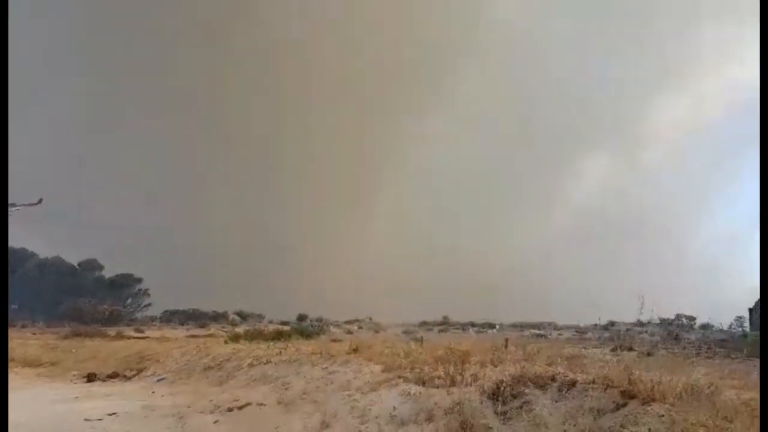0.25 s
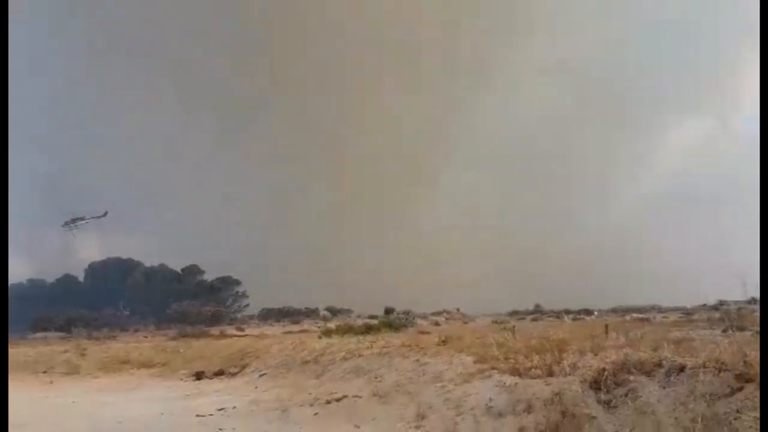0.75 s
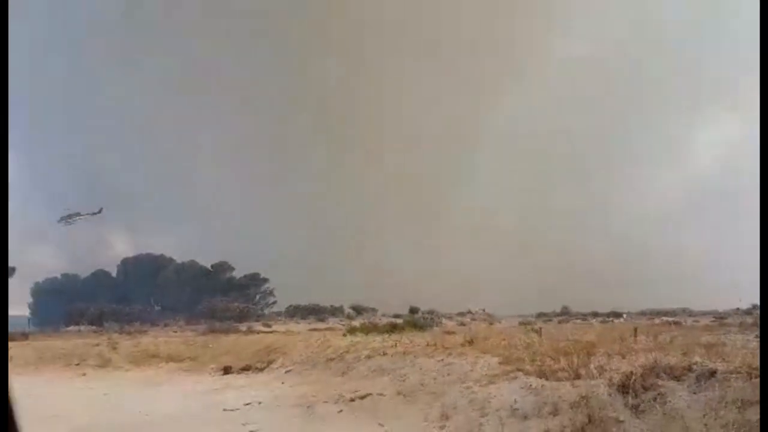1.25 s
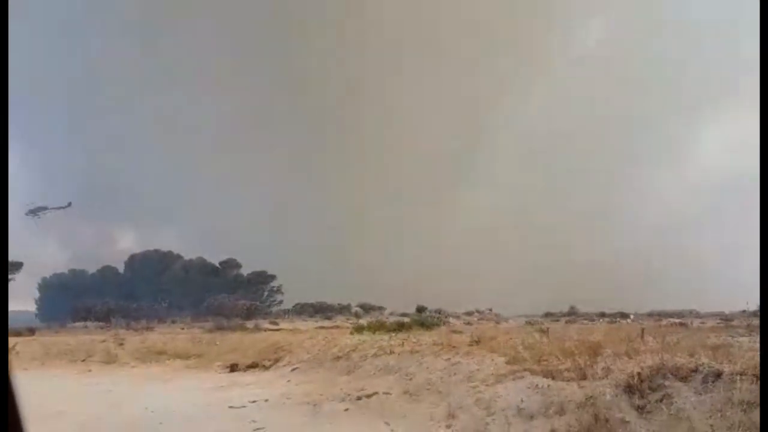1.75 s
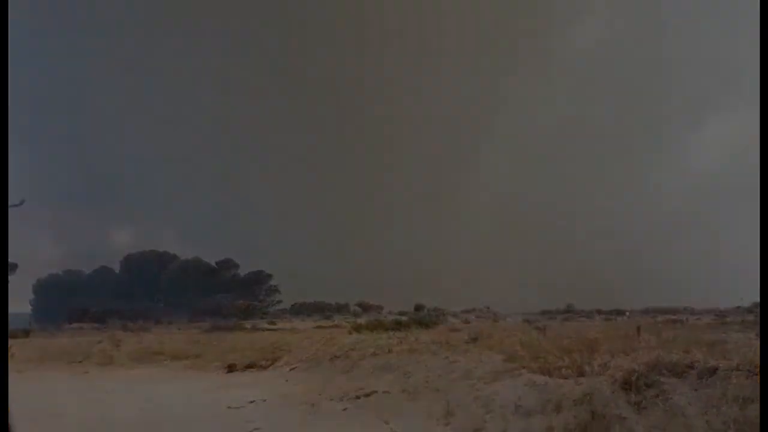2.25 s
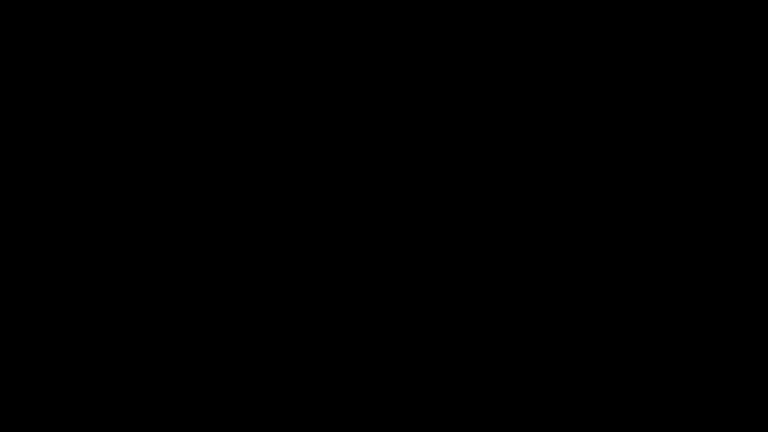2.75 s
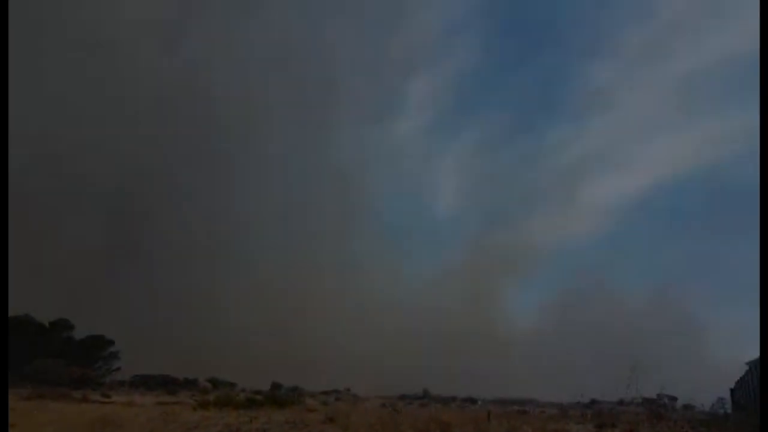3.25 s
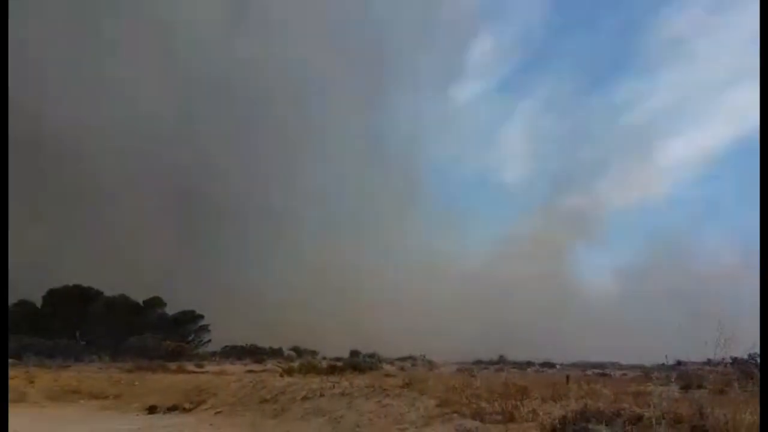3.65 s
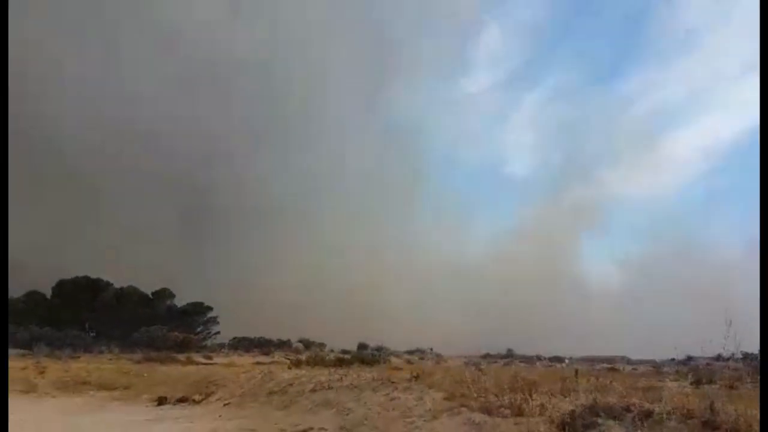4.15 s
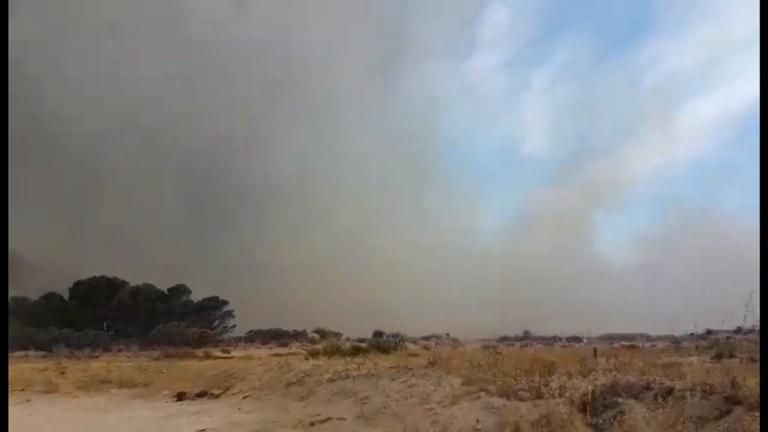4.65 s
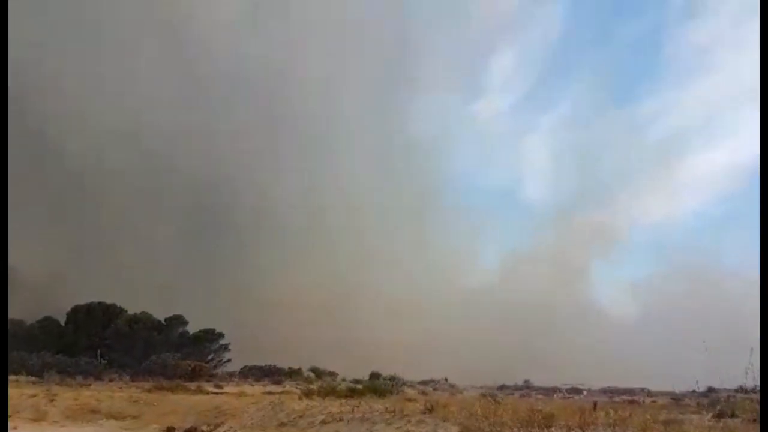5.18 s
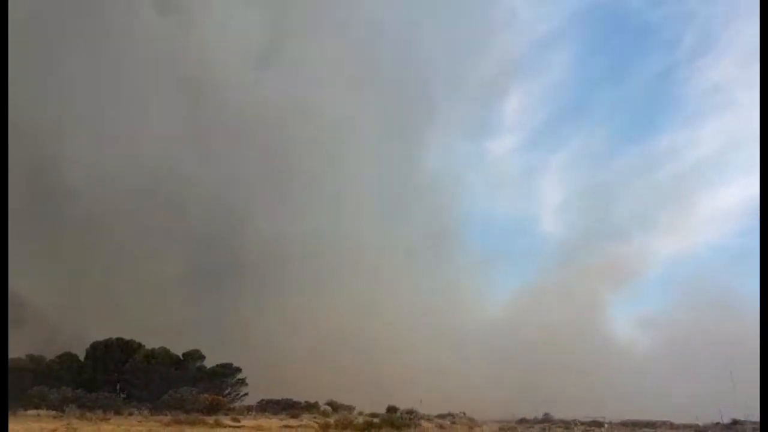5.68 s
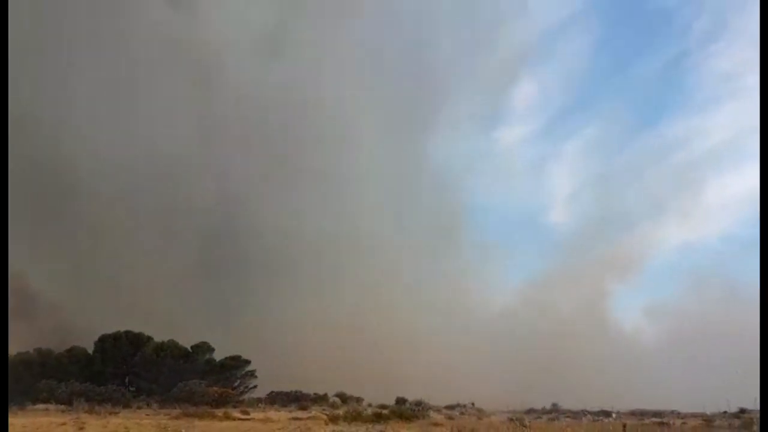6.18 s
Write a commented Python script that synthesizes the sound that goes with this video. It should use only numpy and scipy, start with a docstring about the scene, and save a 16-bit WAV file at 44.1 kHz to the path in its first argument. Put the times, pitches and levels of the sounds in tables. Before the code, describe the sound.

A microphone in open dry land first catches distant helicopter rumble, whooshing gently in the wind, with grass hiss and small dry snaps. The sound drops out for an instant, then jumps to a nearer machine: sharp pitched tail buzz, about eleven main-blade beats a second, and airy swish. A small tick passes early; thump and roar grow toward the end, with a short echo off ground and trees.

```python
"""Open scrub with a bushfire, and a helicopter at work over it. First it is far off: a smeared, wavering hum
and whooshing rush made of sines and noise, over hissing wind and faint crackle. After a moment of silence the
scene changes and it is much nearer: the tail rotor buzzes in sharp pulses, and the main blades slap about
eleven times a second, with a deep thump that grows as it approaches. Swishing and roaring noise lie over both
rotors."""
import sys
import numpy as np
from scipy import signal
from scipy.fft import rfft, irfft, next_fast_len
from scipy.io import wavfile
from scipy.ndimage import uniform_filter1d, minimum_filter1d, map_coordinates

SR = 44100
rng = np.random.default_rng(int(sys.argv[2]) if len(sys.argv) > 2 else 0)


def persist_wave(psi):
    """Save psi, clipped to +-1, as 16-bit WAV."""
    counts = np.round(np.clip(psi, -1, 1) * 32767).astype(np.int16)
    wavfile.write(sys.argv[1], SR, np.atleast_2d(counts).T)


N = 283224
SILENCE_FROM_S, SILENCE_TO_S = 2.821, 2.853  # between the far and the near helicopter


def near_helicopter():
    """Two geared rotors throw pulses and puffs of turbulence; the turbine roars and the land echoes."""
    tail_count, main_count = blade_counts()
    tail = tail_rotor(tail_count)
    main = main_rotor(main_count)
    swish = blade_swish(tail_count, main_count)
    slap_echo = amp(-12) * scattered(main)
    buzz_echo = amp(-24) * scattered(tail + swish)
    return tail + main + terrain_rebound(main) + swish + turbine_exhaust() + slap_echo + buzz_echo


# How close the helicopter is, which drives the level and colour of the near sounds.
# Each row: time in seconds, nearness from 0 (far) to 1 (near).
APPROACH = [(2.85, 0.16), (3.6, 0), (4.2, 0.084), (5, 0.46), (5.4, 0.93), (5.9, 1), (6.42, 0.92)]


def nearness():
    """The approach as straight stretches between the rows, one value for every sample."""
    return curve(APPROACH)


# How fast the tail blades pass, sinking as the Doppler lift fades.
# Each row: time in seconds, tail blades per second.
TAIL_BLADE_RATE = [(2.85, 58.01), (3.45, 57.95), (4.8, 57.31), (6.05, 57.22), (6.42, 56.82)]


def blade_counts():
    """Tail and main blades passed so far; gears tie the rotors, at 5.347 tail blades per main blade."""
    rate = curve(TAIL_BLADE_RATE)
    tail_count = blade_count(rate, first=2.8521)
    main_count = blade_count(rate / 5.347, first=2.8858)
    return tail_count, main_count


# The colour of one tail blade pulse.
# Each row: frequency in Hz, then relative level in dB when far, halfway and near.
TAIL_PULSE_COLOUR = [(58, -22, -17.5, -15.5), (108, -25.5, -16, -17.5), (161, -21, -5.5, 5.5),
                     (241, -8, 0, -3), (312, -9.5, -4, -7.5), (341, 1.5, 4, 5), (414, -3.5, -3, -4),
                     (458, -12, -1.5, -10.5), (530, -12.5, -4.5, -5), (577, -10, -9.5, -9),
                     (698, -16.5, -20.5, -16.5), (766, -28.5, -23, -26), (830, -43.5, -34, -48),
                     (1600, -48.5, -40, -37.5)]
TAIL_DB, TAIL_GROWS_DB = -24.5, 2  # level when far, and gain when near
HARD_TAIL_DB = -4  # the buzz is weaker while the blades bite hard


def tail_rotor(count):
    """Each small fast blade sends out a sharp suction pulse, and together they buzz."""
    level_db = TAIL_DB + TAIL_GROWS_DB * nearness() + HARD_TAIL_DB * hard_bite()
    return blade_pulses(count, level_db, TAIL_PULSE_COLOUR, scatter_db=1.0, ripple_db=1.6,
                        jitter_s=0.00004, dull_hz=1430, ground_hz=103)


# The colour of one main blade slap.
# Each row: frequency in Hz, then relative level in dB when far and near.
MAIN_PULSE_COLOUR = [(12, -43, -33.5), (43.6, -10, -7.5), (63, -8.5, -2), (83.3, -19, -18), (96, -2, 1),
                     (129, -7.5, 4), (164, -6.5, 2), (200, -9, -19.5), (224, -2.5, -13.5), (342, -1, -6),
                     (463, -8.5, -20.5), (604, -11.5, -18), (670, -8, -26), (886, -29.5, -42)]
SLAP_DB, SLAP_GROWS_DB = -37, 14.5  # level when far, and gain when near
THUMP_DB, THUMP_GROWS_DB = -32, 12  # the same for the deep part
HARD_SLAP_DB, SLAP_UNTIL_S, SLAP_EASE_S = 8, 3.47, 0.14  # extra slap at first, fading around this time
THUMP_LAG_S = 0.0046  # the thump trails the crack of the slap


def main_rotor(count):
    """Each big blade slaps the air; the bass is split off as a thump with its own level and delay."""
    near = nearness()
    hard_slap = step(SLAP_UNTIL_S - clock(), SLAP_EASE_S)
    slap_db = SLAP_DB + SLAP_GROWS_DB * near + HARD_SLAP_DB * hard_slap
    thump_db = THUMP_DB + THUMP_GROWS_DB * near
    # turned over: these pulses press where the tail's suck
    slap = -blade_pulses(count, slap_db, MAIN_PULSE_COLOUR, scatter_db=0.9, ripple_db=0.98,
                         jitter_s=0.0004, dull_hz=870, ground_hz=125)
    bass = filtered(slap, lambda hz: 1 / (1 + (hz / 160) ** 6))
    late_bass = filtered(bass, lambda hz: delay(hz, THUMP_LAG_S))
    thump = amp(thump_db - slap_db) * late_bass  # undoes the slap's level and sets the thump's
    return slap - bass + thump


def terrain_rebound(main):
    """The bass of each slap comes back once more from the terrain, 14 ms later and weaker."""
    return filtered(main, lambda hz: amp(-9) / (1 + (hz / 170) ** 4) * delay(hz, 0.014))


# The colour of the turbulence. Each row: frequency in Hz, relative level in dB.
SWISH_NOISE_COLOUR = [(400, -22.5), (850, 5.5), (1000, 0.5), (1250, -1.5), (1520, 0.5), (1800, -5),
                      (2300, -9.5), (3200, -19), (4000, -21.5), (4800, -26), (5600, -36.5), (8000, -42.5),
                      (10000, -56.5)]
# Brief jumps of the swish. In all rows but the last, a blade cuts a vortex and cracks harder;
# the last row is no blade but a short click of noise where the sound is cut off.
# Each row: time in seconds, rise of the swish in dB.
SWISH_JUMPS = [(3.531, 8), (4.426, 6), (4.831, 6.5), (6.398, 10.5)]
SWISH_JUMP_S = 0.011  # length of such a jump
SWISH_DB, SWISH_GROWS_DB = -60, 2  # level when far, and gain when near
HARD_SWISH_DB = 3.5  # extra swish while the blades bite hard
# it opens up once near enough: nearness, softness of that change, gain
SWISH_OPENS_AT, SWISH_EASE, SWISH_OPENS_DB = 0.14, 0.031, 6.5


def blade_swish(tail_count, main_count):
    """Every blade stirs a puff of turbulence: noise that swells just after the blade has passed."""
    near = nearness()
    level_db = SWISH_DB + SWISH_GROWS_DB * near + HARD_SWISH_DB * hard_bite()
    level_db += SWISH_OPENS_DB * step(near - SWISH_OPENS_AT, SWISH_EASE)
    for s, rise_db in SWISH_JUMPS:
        level_db += rise_db * swell(s, SWISH_JUMP_S)
    uneven = amp(3.1 * wobble(60))
    tail_puffs = puffs(tail_count - 0.12, sharpness=3.6) * uneven
    main_puffs = puffs(main_count - 0.04, sharpness=20)
    gate = unit(0.3 + tail_puffs + 0.43 * main_puffs)
    return amp(level_db + 1.5 * wobble(25)) * gate * noise(SWISH_NOISE_COLOUR)


# The colour of the turbine's roar. Each row: frequency in Hz, relative level in dB.
ROAR_COLOUR = [(900, -19), (1350, -13.5), (1520, 1), (1750, -10.5), (2050, -0.5), (2350, 1.5), (2750, -14),
               (3200, -15), (4000, -22.5), (4700, -22.5), (5400, -26.5), (8000, -36.5), (10000, -51.5)]
EXHAUST_DB, EXHAUST_GROWS_DB = -87, 21  # level when far, and gain when near


def turbine_exhaust():
    """The turbine's roar: unsteady coloured noise that grows with the approach."""
    level_db = EXHAUST_DB + EXHAUST_GROWS_DB * nearness() + 2.8 * wobble(21)
    return amp(level_db) * noise(ROAR_COLOUR)


def hard_bite():
    """At first the blades bite hard (1), easing off to 0 around 3.3 s."""
    return step(3.315 - clock(), ease=0.069)


def blade_count(rate, first):
    """Blades passed so far; blade 0 passes at the time first."""
    turns = np.cumsum(rate) / SR
    return turns - np.interp(first, clock(), turns)


def puffs(count, sharpness):
    """One smooth bump per blade, narrower for more sharpness."""
    return np.exp(sharpness * (np.cos(2 * np.pi * count) - 1))


def blade_pulses(count, level_db, table, scatter_db, ripple_db, jitter_s, dull_hz, ground_hz, size=4096):
    """One suction pulse per blade; its colour follows the nearness and is rippled by the air."""
    s = np.interp(np.arange(int(count[-1]) + 1), count, clock())
    spacing = np.mean(np.diff(s)) * SR
    s = s + jitter_s * rng.standard_normal(len(s))
    hz = np.fft.rfftfreq(size, 1 / SR)
    near = np.interp(s, clock(), nearness())[:, None]

    # blend the table's columns, from far to near
    stages = len(table[0]) - 1
    colour_db = 0
    for k in range(stages):
        share = np.maximum(1 - abs(near * (stages - 1) - k), 0)
        colour_db = colour_db + share * along(table, hz, axis=k + 1)
    ripple = unit(uniform_filter1d(rng.standard_normal((len(s), len(hz))), size=10, axis=1))
    gain = amp(colour_db + ripple_db * (1 + near) * ripple)
    gain = gain / (1 + (hz / dull_hz) ** 5)  # the air takes the treble

    # folding the cepstrum (minimum phase) makes each pulse start at its blade, never before
    cepstrum = irfft(np.log(gain + 1e-6))
    cepstrum[:, 1:size // 2] *= 2
    cepstrum[:, size // 2 + 1:] = 0
    lag = 2 * np.arctan2(hz * ground_hz, ground_hz ** 2 - hz ** 2)  # the bass trails along the ground
    part_sample = 2 * np.pi * hz / SR * (s * SR % 1)[:, None]  # places pulses between samples
    pulses = irfft(np.exp(rfft(cepstrum) - 1j * lag - 1j * part_sample))
    pulses *= np.hanning(2 * size)[size:]

    pulse_db = np.interp(s, clock(), level_db) + scatter_db * rng.standard_normal(len(s))
    strength = amp(pulse_db) * np.sqrt(spacing)  # so the level is the rms of the whole train
    track = np.zeros(N)
    for at, g, pulse in zip(s, strength, pulses):
        add(track, int(at * SR), -g * pulse / np.linalg.norm(pulse))
    return track


# How long the echo of ground and trees lasts.
# Each row: frequency in Hz, time to fade by 60 dB in seconds.
TREE_ECHO = [(40, 0.57), (300, 0.35), (1000, 0.49), (8000, 0.047)]


def scattered(x):
    """Diffuse echo: the sound smeared by fading noise, each frequency dying at its own speed."""
    hz, t, z = signal.stft(rng.standard_normal(SR // 2), SR, nperseg=256)
    fade = amp(-60 * t / along(TREE_ECHO, hz)[:, None])
    tail = signal.istft(z * fade, SR, nperseg=256)[1]
    return signal.fftconvolve(x, tail / np.linalg.norm(tail))[:N]


def far_helicopter():
    """Distance smears the blade beats into rumble, beside a rush and a wavering hum."""
    return far_rumble() + far_rush() + far_hum()


# The colour of the far rumble. Each row: frequency in Hz, relative level in dB.
FAR_RUMBLE_COLOUR = [(12, -48), (30, 4.5), (42, -8.5), (60, 1), (80, -3), (125, -4.5), (190, 1.5),
                     (300, -4.5), (350, 0.5), (400, -7), (460, -16), (620, -12.5), (720, -22),
                     (1200, -68.5)]


def far_rumble():
    """Low noise with a restless level stands for the smeared blade beats."""
    return amp(-38 + 1.5 * wobble(20)) * noise(FAR_RUMBLE_COLOUR)


# The colour of the far rush. Each row: frequency in Hz, relative level in dB.
FAR_RUSH_COLOUR = [(450, 3), (700, -12), (780, 7.5), (850, -1.5), (930, 6.5), (1000, -0.5), (1100, 1.5),
                   (1300, -7.5), (1800, -7.5), (2400, -9), (2800, -11.5), (3300, -29), (5000, -64)]
# Whooshes in which the wind carries the rush over. Each row: time of the peak in seconds,
# length in seconds, level in dB, centre in Hz, width in octaves.
WIND_WHOOSHES = [(.2, 0.32, -51.5, 496, 0.091), (1.282, 0.14, -40.5, 324, .1),
                 (1.397, 0.41, -58.5, 1730, 0.46), (1.468, 0.58, -56.5, 1030, 0.18),
                 (1.826, .14, -52, 796, 0.55), (1.874, 0.14, -42, 342, .1)]


def far_rush():
    """A steady coloured rush, with bands of noise that swell and sink as the wind carries it."""
    rush = amp(-54 + 0.48 * wobble(17)) * noise(FAR_RUSH_COLOUR)
    for s, length, db, centre_hz, octaves in WIND_WHOOSHES:
        level = amp(db + 1.9 * wobble(16)) * swell(s, length)
        rush += level * band(centre_hz, octaves, skirt_db=-71)
    return rush


# The lines of the far rotor.
# Each row: frequency in Hz, relative level in dB, time of its swell in seconds.
ROTOR_LINES = [(101.6, -2.5, 1.7), (154.5, 0.5, 1.33), (268, -7.5, 1.44)]
HUM_DB, HUM_SWELL_DB, HUM_SWELL_S = -41.5, 5, 0.54  # shared level; height and length of each swell


def far_hum():
    """Rotor tones as sines that waver in level and phase; each one swells once."""
    hum = np.zeros(N)
    for hz, db, swell_s in ROTOR_LINES:
        level_db = HUM_DB + db + HUM_SWELL_DB * swell(swell_s, HUM_SWELL_S) + 2.5 * wobble(9.28)
        hum += amp(level_db) * np.sin(2 * np.pi * hz * clock() + 0.85 * wobble(10))
    return hum


def scrub():
    """Wind hisses in dry grass, with crackles, rustles and a tick."""
    out = grass_wind() + crackles() + rustles()
    add(out, int(3.371 * SR), hard_tick())
    return out


# The colour of the hiss in the grass. Each row: frequency in Hz, relative level in dB.
GRASS_COLOUR = [(300, -30), (2000, 2), (3500, 1), (5700, -4), (6600, -8), (7700, -6.5), (8800, -22.5),
                (11000, -16.5), (13000, -13), (15800, -11)]
AIR_FAR_DB, AIR_NEAR_DB, AIR_GROWS_DB = -70, -73.5, 5.5  # before and after the silence; gain when near
GUST_AT_S, GUST_LENGTH_S, GUST_DB = 0.68, 0.41, 4.5


def grass_wind():
    """Wind in dry grass as coloured noise, with one gust."""
    before = clock() < SILENCE_FROM_S
    air_db = np.where(before, AIR_FAR_DB, AIR_NEAR_DB + AIR_GROWS_DB * nearness())
    air_db = air_db + GUST_DB * swell(GUST_AT_S, GUST_LENGTH_S)
    return amp(air_db + 0.92 * wobble(10)) * noise(GRASS_COLOUR)


# The loudest dry crackles.
# Each row: time in seconds, level in dB before the gain that all of them share.
LOUD_CRACKLES = [(0.085, -49), (0.244, -53), (0.688, -51), (0.8948, -57.5), (1.2655, -52), (1.714, -54),
                 (1.95, -57), (2.3348, -53), (4.6578, -51), (4.7233, -54), (4.7607, -54)]
CRACKLE_DB, CRACKLE_T60_S = -3, 0.013  # shared gain, and time to fade by 60 dB


def crackles():
    """Dry snaps: short fading bursts of noise, with many faint random ones before the silence."""
    t = np.arange(SR // 10) / SR
    snaps = np.zeros(N)
    for s, db in LOUD_CRACKLES:
        add(snaps, int(s * SR), amp(db + CRACKLE_DB - 60 * t / CRACKLE_T60_S))
    sparks = (rng.random(N) < 45 / SR) * amp(3.6 * rng.standard_normal(N))  # about 45 a second
    faint = amp(-66) * signal.fftconvolve(sparks, amp(-60 * t / 0.011))[:N]
    snaps += faint * (clock() < SILENCE_FROM_S)
    return snaps * band(4300, 0.39, skirt_db=-24.5)


# Brief rustles and thin squeaks close by. Each row: time of the peak in seconds,
# length in seconds, level in dB, centre in Hz, width in octaves.
CLOSE_RUSTLES = [(2.952, 0.089, -71, 5330, 0.48), (3.542, 0.037, -75, 8170, 0.96),
                 (3.7, 0.017, -59.5, 8000, 1), (5.284, 0.1, -75, 5800, 0.32),
                 (5.482, 0.013, -78, 12200, 0.06), (5.533, .035, -86, 11800, .04),
                 (5.586, 0.095, -69.5, 4500, 0.057), (5.607, .08, -71.5, 5790, .09)]


def rustles():
    """Each rustle is a short swell of band noise with a rough level; the narrow bands squeak."""
    out = np.zeros(N)
    for s, length, db, centre_hz, octaves in CLOSE_RUSTLES:
        level = amp(db + 5.2 * wobble(120)) * swell(s, length)
        out += level * band(centre_hz, octaves, skirt_db=-41)
    return out


# The ringing of one small hard tick.
# Each row: frequency in Hz, starting level in dB, time to fade by 60 dB in seconds.
TICK_RING = [(1550, -41, .045), (1980, -42, 0.031), (2600, -49.5, 0.036), (6100, -59, .025)]


def hard_tick():
    """A small knock: a few fading sines under a short crack of noise."""
    t = np.arange(SR // 10) / SR
    ring = sum(amp(db - 60 * t / t60) * np.sin(2 * np.pi * hz * t) for hz, db, t60 in TICK_RING)
    crack = amp(-53.5 - 60 * t / 0.021) * band(2300, 0.7, skirt_db=-34.5)[:len(t)]
    return ring + crack


def amp(db):
    """Decibels to gain."""
    return 10 ** (np.asarray(db) / 20)


def unit(x):
    """x at rms 1."""
    return x / np.sqrt(np.mean(x ** 2) + 1e-20)


def clock():
    """The time of every sample in seconds."""
    return np.arange(N) / SR


def along(points, hz, axis=1):
    """One column of a table by frequency, read on a log axis."""
    table = np.array(points, float)
    return np.interp(np.log(hz + 1), np.log(table[:, 0] + 1), table[:, axis])


def curve(rows):
    """Straight lines through rows of time and value, one value per sample."""
    s, values = np.transpose(rows)
    return np.interp(clock(), s, values)


def wobble(rate):
    """A smooth random curve, drawn through rate random points a second."""
    points = rng.standard_normal(int(N * rate / SR) + 4)
    return map_coordinates(points, [clock() * rate])


def swell(at, length):
    """A smooth rise from 0 to 1 at a moment, and back."""
    return np.exp(-2 * ((clock() - at) / length) ** 2)


def step(x, ease):
    """A smooth step from 0 to 1 as x passes zero."""
    return 0.5 + 0.5 * np.tanh(x / (2 * ease))


def delay(hz, seconds):
    """The response of a pure delay."""
    return np.exp(-2j * np.pi * hz * seconds)


def filtered(x, response):
    """x times a response of frequency."""
    m = next_fast_len(N + SR // 2)
    return irfft(rfft(x, m) * response(np.fft.rfftfreq(m, 1 / SR)), m)[:N]


def noise(colour):
    """Coloured noise of rms 1."""
    return unit(filtered(rng.standard_normal(N), lambda hz: amp(along(colour, hz))))


def band(centre, octaves, skirt_db):
    """Noise of rms 1 in a bell around one frequency, over a flat skirt."""
    def bell(hz):
        widths_away = np.log2((hz + 1) / centre) / octaves
        return amp(-4 * widths_away ** 2) + amp(skirt_db)
    return unit(filtered(rng.standard_normal(N), bell))


def add(track, start, sound):
    """Mix a sound into a track from a sample on."""
    room = track[max(start, 0):][:len(sound)]
    room += sound[:len(room)]


def scene():
    """The far helicopter, a moment of silence, then the near one."""
    ground, t = scrub(), clock()
    before = t < SILENCE_FROM_S
    # short fades in and out
    after = np.interp(t, [SILENCE_TO_S, SILENCE_TO_S + 0.001, t[-1] - 0.004, t[-1]], [0, 1, 1, 0])
    far = before * (far_helicopter() + ground)
    near = after * (near_helicopter() + ground)
    return (far + near)[None]


def record(dry):
    """A limiter holds the hardest slaps down; then all above 15.8 kHz and the lowest bass are cut."""
    needed = np.minimum(1, amp(-8.2) / (abs(dry[0]) + 1e-9))
    gain = minimum_filter1d(needed, size=600)
    gain = uniform_filter1d(uniform_filter1d(gain, size=300), size=300)
    return filtered(dry[0] * gain, lambda hz: (hz < 15800) * hz ** 2 / (hz ** 2 + 8 ** 2))[None]


dry = scene()
out = record(dry)
persist_wave(out)
```